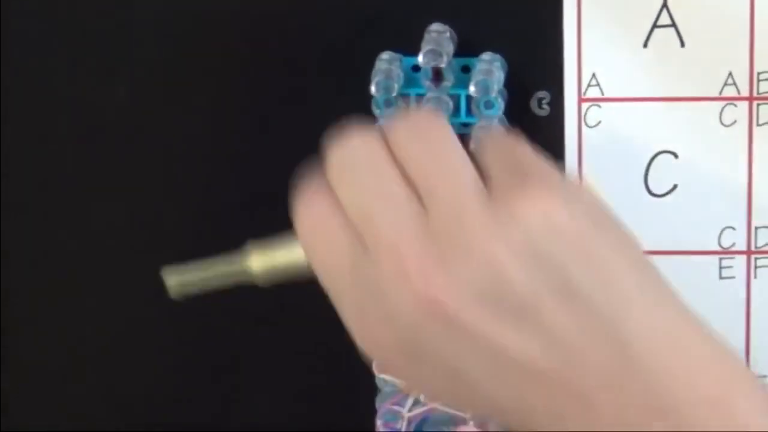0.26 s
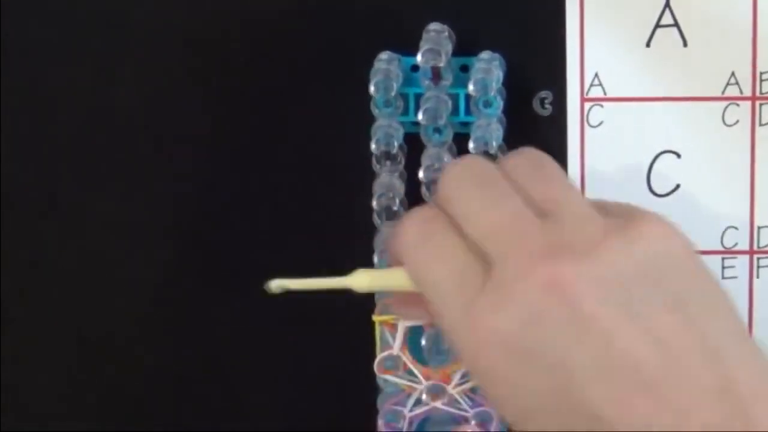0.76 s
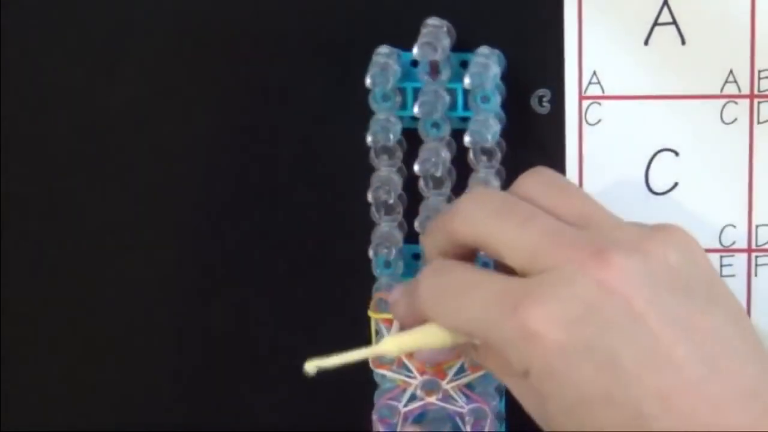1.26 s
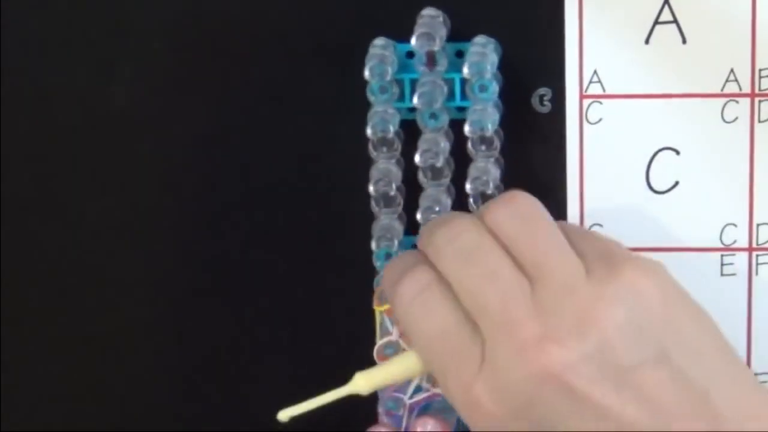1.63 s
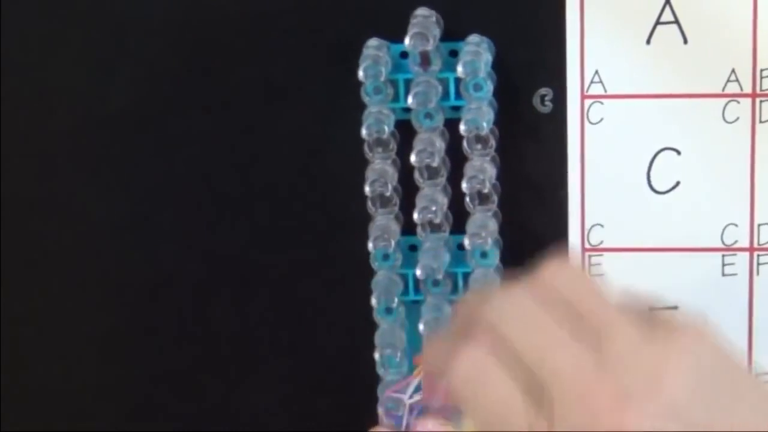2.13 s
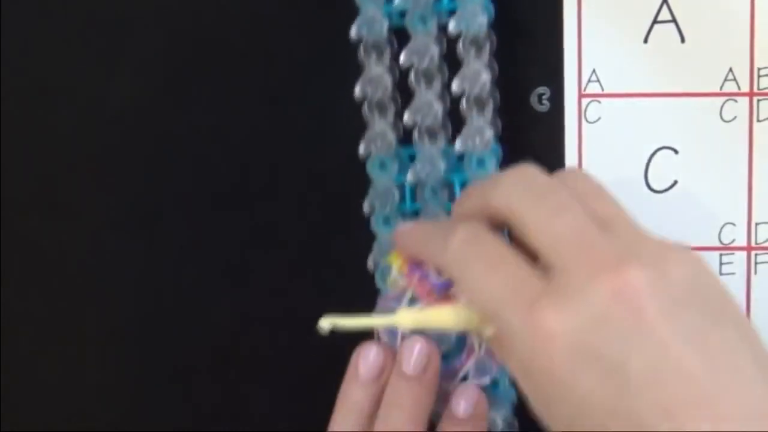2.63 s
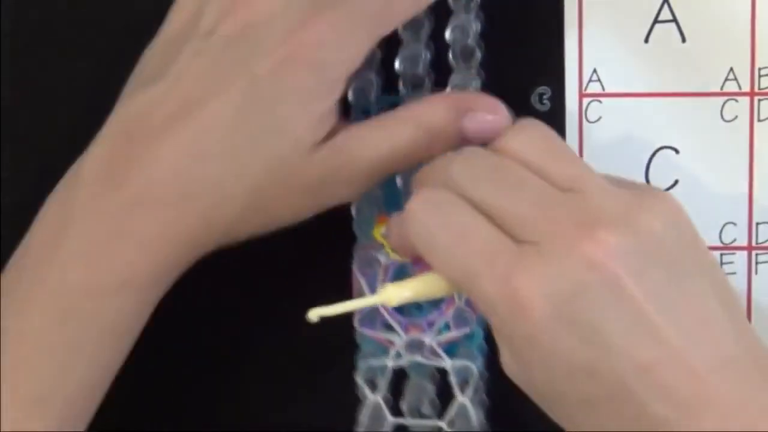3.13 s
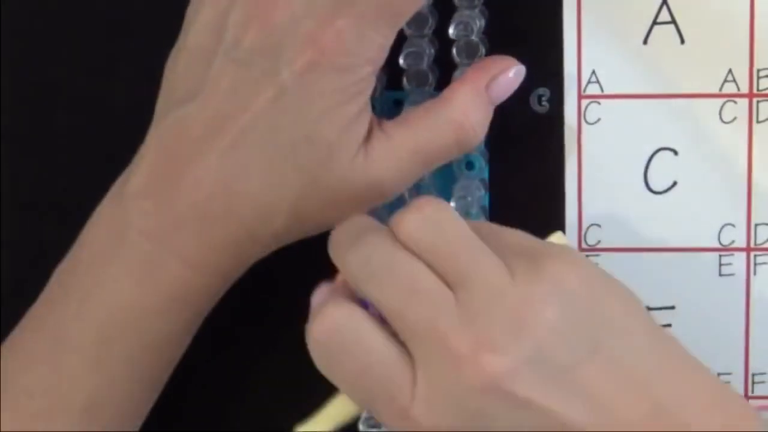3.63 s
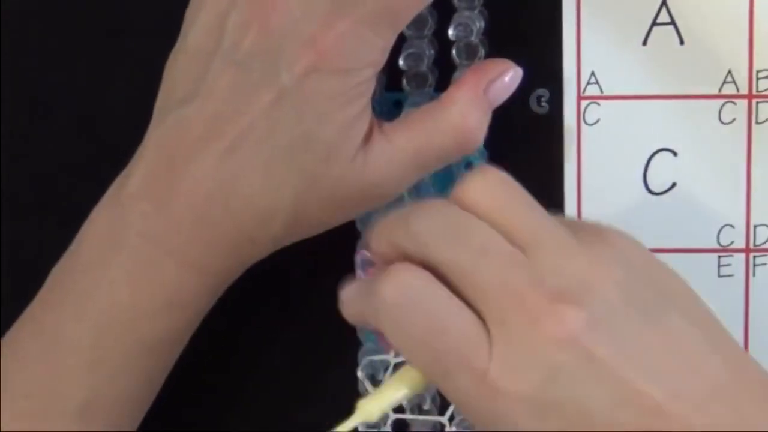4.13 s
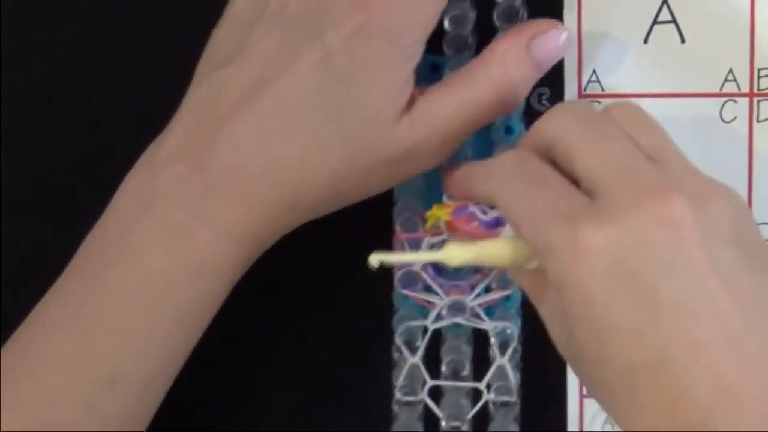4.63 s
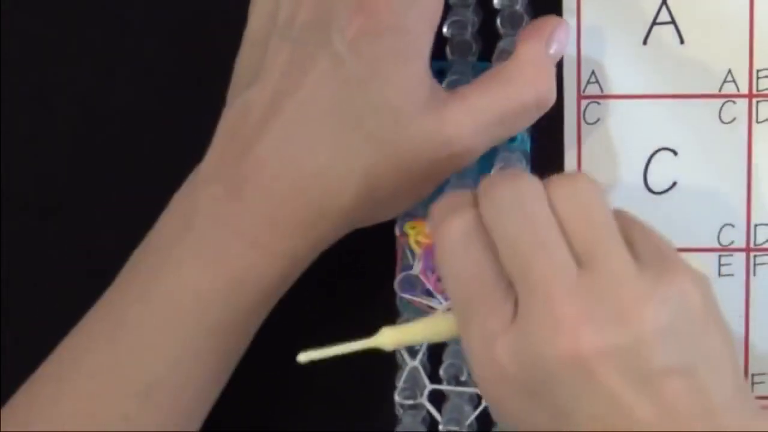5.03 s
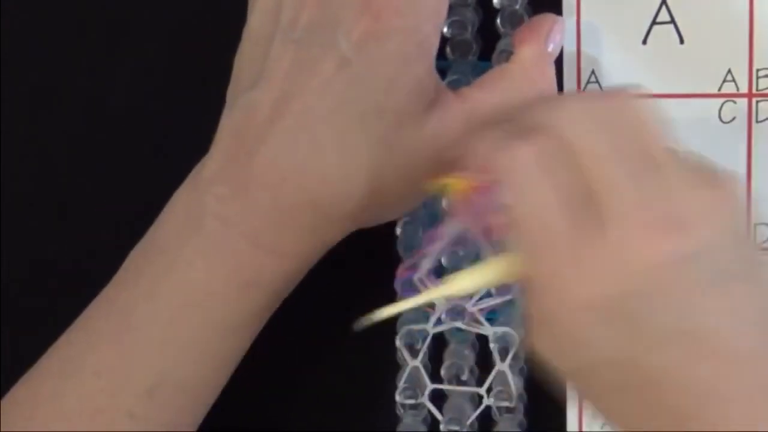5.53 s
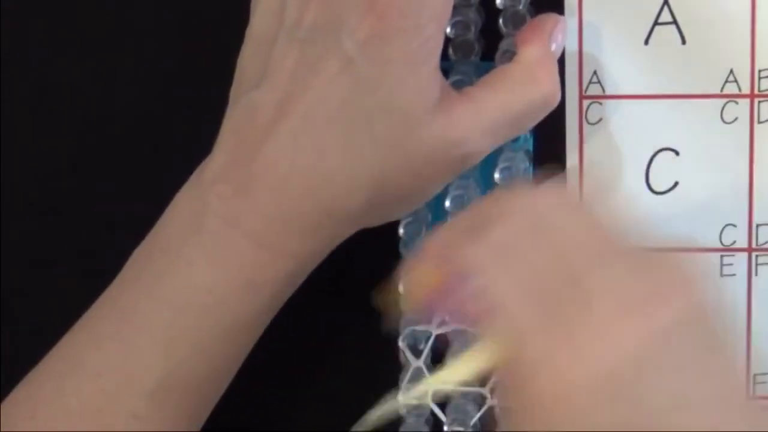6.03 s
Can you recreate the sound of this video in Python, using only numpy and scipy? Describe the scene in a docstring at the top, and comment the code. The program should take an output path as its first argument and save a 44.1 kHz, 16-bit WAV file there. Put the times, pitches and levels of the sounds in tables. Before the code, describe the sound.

Close, intermittent handling of rubber bands on plastic pegs: thin ticks, sharp hollow snaps, faint crackle, cloth strokes and low thuds in a still room.

```python
"""Fingers and a small hook work rubber bands off a plastic craft loom on a cloth-covered table, heard close up.
A still small room and a low rumble (coloured noise) are there from the start, with faint rubbing and band crackle.
Then come thin ticks of nail and hook, and bands that snap free (sharp noise bursts and ringing plastic).
Next, hard tugs ring the loom and knock the table, the loom drags on the cloth, and fingers rub the bands.
Later a hand strokes the cloth or rests with a soft thud (grainy noise, a deep sine); snaps go on almost to the end."""
import sys
import numpy as np
from scipy import signal
from scipy.fft import rfft, irfft, next_fast_len
from scipy.io import wavfile
from scipy.ndimage import uniform_filter1d, map_coordinates

SR = 44100
rng = np.random.default_rng(int(sys.argv[2]) if len(sys.argv) > 2 else 0)


def wrap_up_sound(samples):
    """Save the sound to the file named by the first command line argument, as 16-bit audio."""
    columns = np.atleast_2d(samples).T
    # keep every value between -1 and 1, then stretch to whole-number steps
    tamed = np.clip(columns, -1, 1)
    steps = np.round(tamed * 32767).astype(np.int16)
    wavfile.write(sys.argv[1], SR, steps)


N = 276496  # length in samples


def amp(db):
    """Turn decibels into a gain."""
    return 10 ** (np.asarray(db) / 20)


def unit(x):
    """Scale x to an rms of 1."""
    return x / np.sqrt(np.mean(x ** 2) + 1e-20)


def along(points, hz):
    """Read a curve of (Hz, value) points at any frequency, on a log axis."""
    point_hz, value = np.transpose(points)
    return np.interp(np.log(hz + 1), np.log(point_hz + 1), value)


def fade(t, t60):
    """Exponential decay that loses 60 dB in t60 seconds."""
    return np.exp(-np.log(1000) * t / t60)


def wobble(rate):
    """A smooth random curve through `rate` random points a second."""
    knots = rng.standard_normal(int(N * rate / SR) + 4)
    return map_coordinates(knots, [np.arange(N) * rate / SR])


def filtered(x, response):
    """Multiply the spectrum of x by a function of frequency."""
    size = next_fast_len(N + SR // 2)
    return irfft(rfft(x, size) * response(np.fft.rfftfreq(size, 1 / SR)), size)[:N]


def coloured(x, spectrum):
    """Colour x with a curve of (Hz, dB) points and scale it to an rms of 1."""
    return unit(filtered(x, lambda hz: amp(along(spectrum, hz))))


def causal(gain):
    """Minimum phase: the most compact impulse response with this gain that starts at time 0."""
    cepstrum = irfft(np.log(np.maximum(gain, 1e-6)))
    half = len(cepstrum) // 2
    folded = np.r_[cepstrum[0], 2 * cepstrum[1:half], np.zeros(half)]
    return irfft(np.exp(rfft(folded)))


def add(track, s, sound):
    """Mix a sound into the track at s seconds."""
    part = track[max(round(s * SR), 0):][:len(sound)]
    part += sound[:len(part)]


def ring(modes, scatter_db, detune):
    """Fading sine tones; grip and point of contact change their strength and pitch each time."""
    t = np.arange(SR // 8) / SR
    hz, db, t60 = np.transpose(modes)[:, :, None]
    hz = hz * (1 + detune * rng.standard_normal(hz.shape))
    strength = amp(db + scatter_db * rng.standard_normal(hz.shape))
    strength = strength * rng.choice([-1, 1], hz.shape)
    return np.sum(strength * np.sin(2 * np.pi * hz * t) * fade(t, t60), axis=0)


# Basic colour of every sharp contact. Each row: frequency in Hz, relative level in dB.
CONTACT_COLOUR = [(60, -28), (250, -6), (700, -4.5), (1500, 0.5), (2300, -2.5), (3700, -3.5), (4600, 2.5),
                  (5700, 3), (7000, -6.5), (9200, 0.5), (10500, -6), (15500, -5)]


def crack(colour, t60, spike, rise=0.00014, size=2048):
    """One sharp contact and the brief chatter that follows (rise and t60 in seconds), through the plastic."""
    t, hz = np.arange(size) / SR, np.fft.rfftfreq(size, 1 / SR)
    chatter = rng.standard_normal(size) * fade(t, t60) * (1 - np.exp(-t / rise))
    chatter /= np.linalg.norm(chatter)
    chatter[0] += spike
    # the chatter ripples the spectrum but keeps its broad balance
    broad = np.sqrt(np.abs(uniform_filter1d(np.abs(rfft(chatter)) ** 2, size=100)))
    gain = amp(along(CONTACT_COLOUR, hz) + along(colour, hz)) / broad
    return signal.fftconvolve(chatter, causal(gain))


STROKE_SKEW = 0.63  # below 1, a stroke speeds up faster than it slows
STROKE_ARCH = 0.91  # how pointed the peak of a stroke is


def level(strokes):
    """Speed of the hand as a gain: each stroke swells and dies in one skewed arch."""
    t = np.arange(N) / SR
    total = np.zeros(N)
    for start, length, db in strokes:
        progress = np.clip((t - start) / length, 0, 1)
        total += amp(db) * np.abs(np.sin(np.pi * progress ** STROKE_SKEW)) ** STROKE_ARCH
    return total


def rubbing(effort, spectrum, grain_db, uneven_db):
    """Friction: countless tiny catches of uneven size under a wavering pressure, coloured by the surfaces."""
    pressure_db = uneven_db * np.tanh(wobble(35))
    catches = rng.standard_normal(N) * amp(grain_db * wobble(900) + pressure_db)
    return effort * coloured(catches, spectrum)


# The still room. Each row: frequency in Hz, relative level in dB.
AIR_COLOUR = [(60, 5.5), (110, 8.5), (200, 4.5), (500, 0), (900, -3), (1300, 0.5), (1700, -9),
              (2200, -11.5), (2800, -14), (5000, -14), (9000, -18), (16000, -21.5)]
# The building's rumble. Each row: frequency in Hz, relative level in dB.
RUMBLE_COLOUR = [(8, -37), (20, 17), (35, -5), (55, -9.5), (90, -14), (150, -35.5), (400, -88)]


def background(air_db=-66, rumble_db=-51.5, rumble_waver_db=2.2):
    """Steady noise of the air and a deep rumble of the building that wavers in level several times a second."""
    air = amp(air_db) * coloured(rng.standard_normal(N), AIR_COLOUR)
    rumble_gain = amp(rumble_db + rumble_waver_db * wobble(9.5))
    return air + rumble_gain * coloured(rng.standard_normal(N), RUMBLE_COLOUR)


def crackle(force, rate=50, size_db=6.5, gain_db=10):
    """Tacky rubber sticks and slips: about `rate` tiny ticks a second, a few much larger than the rest."""
    out = np.zeros(N)
    chance, size = rng.random(N), np.minimum(rng.exponential(size=N), 3)
    for i in np.flatnonzero(chance < rate / SR):
        tick = crack([(600, -10.0), (4500, 0), (12000, -7)], t60=0.009, spike=0.4, size=512)
        add(out, i / SR, force[i] * amp(gain_db + size_db * size[i]) * tick)
    return out


# Fingers work the stretched bands. Each row: start in seconds, length in seconds, relative level in dB.
FINGER_STROKES = [(1.465, 0.25, -62), (1.73, 0.23, -63.5), (2.22, 0.29, -63), (2.96, 0.37, -69),
                  (3.55, 0.54, -70), (5.05, 0.19, -62), (5.265, .08, -58), (5.35, 0.16, -71)]
# Colour of skin on bands. Each row: frequency in Hz, relative level in dB.
RUBBER_COLOUR = [(300, -47), (1200, 2.5), (2100, -2), (3700, -5.5), (5100, -0.5), (7000, -11.5),
                 (9000, -8.5), (11000, -19.5), (15500, -18)]


def worked_bands(resting_db=-80):
    """Skin rubs the rubber and the rubber crackles; between strokes the fingers are never quite still."""
    force = level(FINGER_STROKES) + amp(resting_db)
    rub = rubbing(force, RUBBER_COLOUR, grain_db=3.5, uneven_db=5.5)
    return amp(-0.5) * rub + crackle(force)


# The loom is dragged over the cloth. Each row: start in seconds, length in seconds, relative level in dB.
DRAG_STROKES = [(0.85, 0.57, -71), (1.45, 0.36, -67), (1.9, 0.74, -63), (2.22, 0.38, -59.5),
                (3.56, 0.51, -65.5), (5.45, 0.97, -71.5)]
# Colour of the base on cloth. Each row: frequency in Hz, relative level in dB.
SCUFF_COLOUR = [(100, -19), (240, 3.5), (400, -1.5), (700, -1), (900, -6), (1200, -2.5), (1700, -8),
                (2250, -2), (2800, -22), (8000, -39.5), (16000, -41)]


def dragged_loom(resting_db=-77):
    """The base scuffs the cloth, with a faint rub even between the drags."""
    effort = level(DRAG_STROKES) + amp(resting_db)
    return amp(-2.0) * rubbing(effort, SCUFF_COLOUR, grain_db=1.0, uneven_db=2.5)


# Nail and hook graze a peg. Each row: time in seconds, relative level in dB.
PEG_GRAZES = [(0.1096, -43.5), (1.0031, -47), (1.4696, -43), (1.5371, -36.5), (1.558, -41), (1.689, -43),
              (1.7796, -39.5), (2.305, -33), (2.8613, -34), (2.9485, -37.5), (3.988, -34.5), (4.7553, -39),
              (5.0414, -40.5), (5.3167, -31.5), (6.1293, -38)]


def ticks(gain_db=13):
    """Nail and hook graze the pegs: thin clicks too light to ring the loom."""
    out = np.zeros(N)
    for s, db in PEG_GRAZES:
        tick = crack([(700, 2.5), (4500, 0.5), (12000, -12)], t60=0.012, spike=0.4)
        add(out, s, amp(db + gain_db) * tick)
    return out


# Bands snap off the pegs. Each row: time in seconds, relative click level in dB,
# weight (low knock over the click) in dB, hollowness (middle clack over the click) in dB.
BAND_SNAPS = [(0.2444, -45.5, -5, -6), (0.274, -41.5, 2, -3), (0.731, -41, -7.5, -16),
              (0.7905, -39, 4.5, 2), (0.7948, -28.5, -5.5, -6), (0.7972, -28, -2, -6.5),
              (0.875, -50.5, 8.5, 2), (1.1787, -30, -6.5, -11.5), (2.1843, -42, 4.5, -7),
              (2.188, -36.5, -1, 2.5), (2.196, -33.5, -2.5, 7), (2.2181, -34.5, -1.5, 1),
              (2.2292, -25, -13.5, 3.5), (2.2322, -31, -6, -5), (2.2458, -27, -5.5, -3.5),
              (2.3248, -45, -6, 2), (2.332, -43.5, 2.5, 5.5), (2.349, -26, -10, 4),
              (2.3722, -38.5, 1.5, -10.5), (2.379, -32, -5, -8.5), (2.3948, -41, -7, -13),
              (2.4364, -23, -10, -10.5), (3.9796, -43.5, 2, -6.5), (4.0271, -37.5, -16.5, -2.5),
              (4.1618, -29.5, -2.5, 3), (4.583, -53.5, 8.5, 6.5), (4.614, -42, -3.5, -4),
              (4.643, -45, -8, 3.5), (5.1246, -42.5, -2, -7), (5.582, -33.5, -2, 5.5), (5.629, -40, 8, -3),
              (5.6913, -22.5, -11, -0.5), (5.7349, -26, -0.5, -18), (5.8254, -45, 5.5, 9),
              (5.926, -39.5, 2.5, 6), (5.944, -38, -7, -4), (6.011, -43.5, -19, 14.5),
              (6.029, -39.5, -6.5, 1), (6.1521, -36.5, -6, 7), (6.1707, -25.5, -8.5, 0),
              (6.2148, -31.5, -1.5, 2)]
# Ringing of the peg rails. Each row: frequency in Hz, relative level in dB, time to fade 60 dB in seconds.
RAIL_MODES = [(620, -8, 0.015), (754, 0.5, 0.075), (908, -1.5, 0.063), (1049, 4.5, 0.048),
              (1165, -0.5, 0.072), (1315, -2, 0.071), (1429, -1.5, 0.083), (2050, 6.5, 0.036),
              (2400, -6, 0.037), (2650, -12, 0.047)]
# Ringing of a peg. Each row: frequency in Hz, relative level in dB, time to fade 60 dB in seconds.
PEG_MODES = [(3268, 11, 0.018), (3160, -32.5, 0.035), (4130, -23.5, 0.0046), (4635, 16, 0.013),
             (5040, 2, 0.0087), (5290, -1, 0.011)]
# Ringing of the base plate, which bumps play too.
# Each row: frequency in Hz, relative level in dB, time to fade 60 dB in seconds.
BASE_MODES = [(310, -22, .06), (341, 1, 0.19), (398.8, -3, 0.18), (464.7, -7.5, 0.19), (513, -1.5, 0.045)]
SCRAPE_LEAD_S = 0.0035  # the band starts to slip this long before it lets go


def snaps(knock_db=32, clack_db=30, click_db=27, edge_db=18,
          scrape_db=-12, rails_db=-11, peg_db=-16, plate_db=-18):
    """A band scrapes up its peg and lets go; peg and rails ring on, and its weight reaches the base plate."""
    out = np.zeros(N)
    for s, click, weight, hollowness in BAND_SNAPS:
        knock, clack = click + weight, click + hollowness
        colour = [(1100, knock + knock_db), (2600, clack + clack_db), (4600, click + click_db),
                  (6000, click + click_db), (9000, click + edge_db)]
        scrape = crack(colour, t60=0.028, spike=0.036, rise=0.0027)
        add(out, s - SCRAPE_LEAD_S, amp(scrape_db) * scrape)
        add(out, s, crack(colour, t60=0.01, spike=0.46))
        add(out, s, amp(knock + rails_db) * ring(RAIL_MODES, scatter_db=2.5, detune=0.0097))
        add(out, s, amp(click + peg_db) * ring(PEG_MODES, scatter_db=4, detune=0.044))
        add(out, s, amp(knock + plate_db) * ring(BASE_MODES, scatter_db=4, detune=0.014))
    return out


# How long the small room rings. Each row: frequency in Hz, time to fade 60 dB in seconds.
ROOM_FADE = [(150, 0.52), (1000, 0.44), (5000, 0.21), (8000, 0.18), (15000, 0.097)]


def room(x):
    """The small room's echo: fading noise that starts 4 ms late and whose treble dies first."""
    hz, t, z = signal.stft(rng.standard_normal(SR // 2), SR, nperseg=256)
    tail = signal.istft(z * fade(t, along(ROOM_FADE, hz)[:, None]), SR, nperseg=256)[1]
    tail = np.r_[np.zeros(round(0.004 * SR)), tail / np.linalg.norm(tail)]
    return signal.fftconvolve(x, tail)[:N]


# The loom is bumped on the table, or a hand comes to rest with a soft thud.
# Each row: time in seconds, then relative levels in dB of the base ring, the table thud and the table knock.
LOOM_BUMPS = [(0.797, -48, -29.5, -47), (1.179, -58, -43, -55), (2.195, -39.5, -35, -63),
              (2.248, -38, -37, -59), (2.351, -37.5, -40.5, -47.5), (2.439, -40, -38.5, -46),
              (3.041, -72, -38.5, -74), (3.616, -68, -41.5, -67), (4.163, -39, -29.5, -34.5),
              (5.737, -43, -38, -60), (5.925, -45, -63, -68), (6.171, -37.5, -56, -62),
              (6.215, -33.5, -38, -66)]
# Knock of the table top. Each row: frequency in Hz, relative level in dB, time to fade 60 dB in seconds.
TABLE_MODES = [(197.7, -3.5, .11), (243, -13.5, 0.061), (540, 3, 0.033)]


def bumps(base_db=-1, shudder_db=13):
    """The base plate rings hollow and shudders; the table knocks and gives a deep, short thud."""
    out, t = np.zeros(N), np.arange(SR // 2) / SR
    shudder_colour = [(100, -4.5), (330, 14.5), (500, 5), (1200, 16.5), (2500, -6), (7000, -25.5)]
    for s, base, thud, knock in LOOM_BUMPS:
        add(out, s, amp(base + base_db) * ring(BASE_MODES, scatter_db=2.5, detune=0.012))
        shudder = crack(shudder_colour, t60=0.38, spike=0.05, size=8192)
        add(out, s, amp(base + shudder_db) * shudder)
        add(out, s, amp(knock) * ring(TABLE_MODES, scatter_db=1.5, detune=0.01))
        add(out, s, amp(thud) * np.sin(2 * np.pi * 37 * t) * fade(t, 0.17))
    return out


# A hand strokes the cloth. Each row: start in seconds, length in seconds, relative level in dB.
HAND_STROKES = [(2.65, 0.43, -57.5), (3.25, 0.45, -59), (4.65, 0.38, -56)]
# Colour of skin on cloth. Each row: frequency in Hz, relative level in dB.
CLOTH_COLOUR = [(300, -37), (850, -5), (1050, 0), (1350, 2), (1650, -2), (2050, -1), (3700, -7), (5300, -2),
                (7200, -13), (9000, -7), (10500, -17), (12300, -11.5), (16000, -25.5)]


def sliding_hand():
    """Skin catches on the cloth as the hand strokes it."""
    return rubbing(level(HAND_STROKES), CLOTH_COLOUR, grain_db=1.5, uneven_db=3.5)


def scene(walls=3, tail_db=-19.5):
    """The loom and hands, never quite still, their room, and its background."""
    friction = worked_bands() + dragged_loom() + sliding_hand()
    contacts = ticks() + snaps()
    knocks = bumps()
    # each snap radiates a different fine pattern toward every wall, so its tail is diffuse
    snap_tail = sum(room(snaps()) for wall in range(walls)) / np.sqrt(walls)
    tail = amp(tail_db) * (room(knocks) + snap_tail)
    return (background() + friction + contacts + knocks + tail)[None]


def record(dry, low_hz=24, top_hz=16100):
    """The microphone sheds the deepest bass; nothing is kept above top_hz."""
    highpass = signal.butter(2, low_hz, "highpass", fs=SR, output="sos")
    thinned = signal.sosfilt(highpass, dry)
    return np.array([filtered(channel, lambda hz: hz < top_hz) for channel in thinned])


dry = scene()
out = record(dry)
wrap_up_sound(out)
```